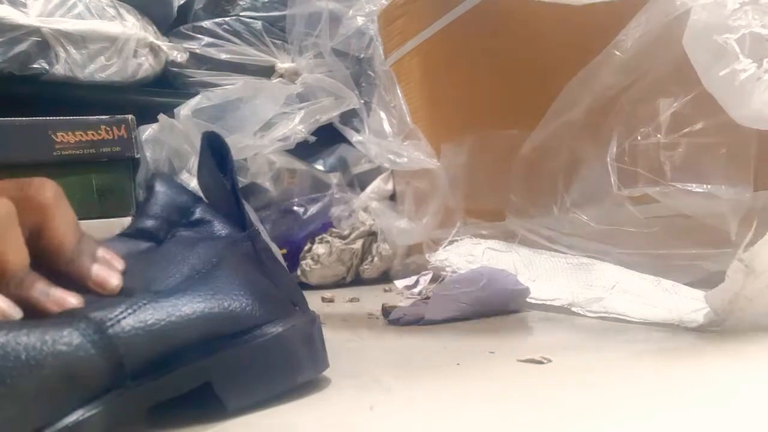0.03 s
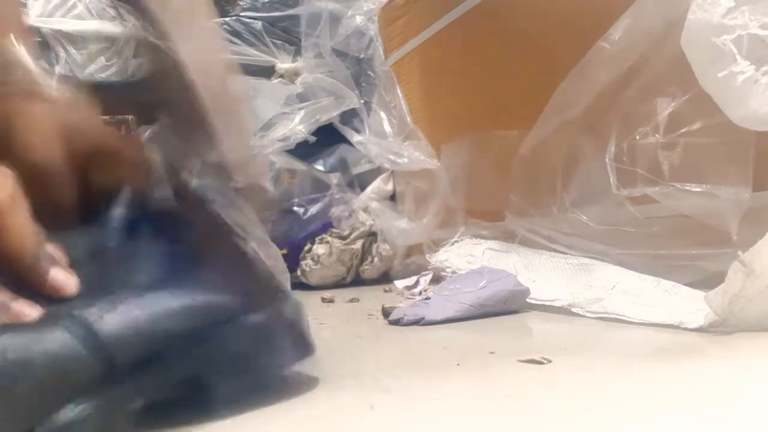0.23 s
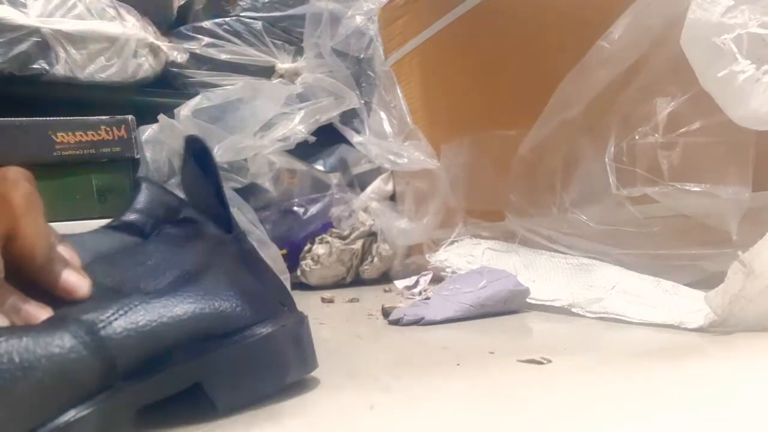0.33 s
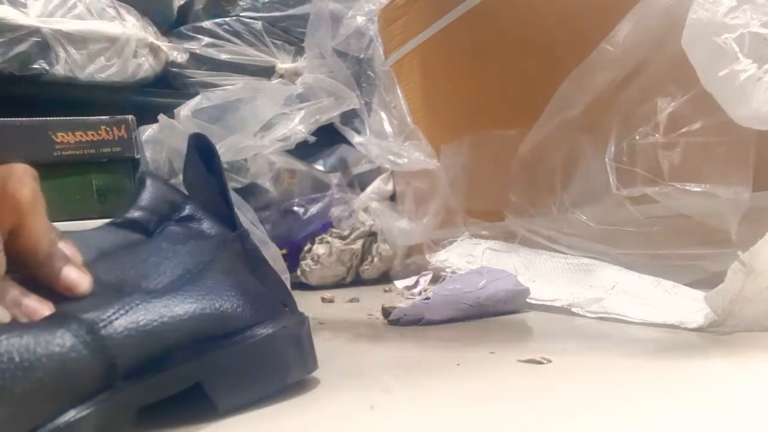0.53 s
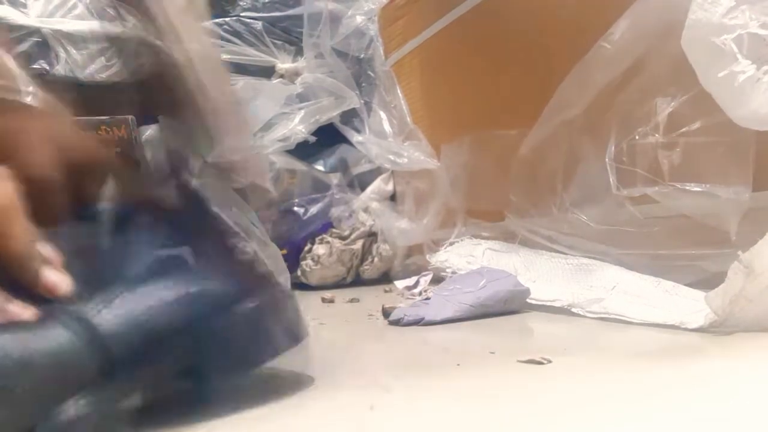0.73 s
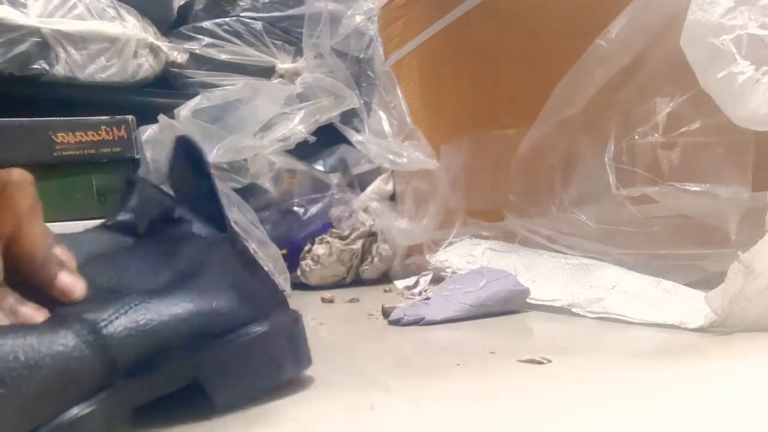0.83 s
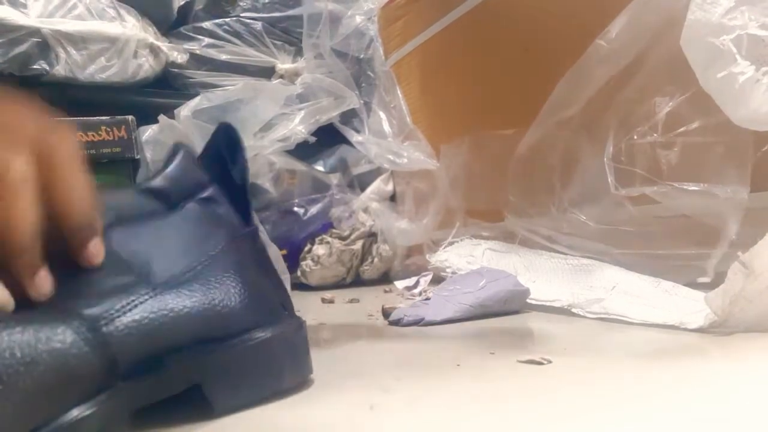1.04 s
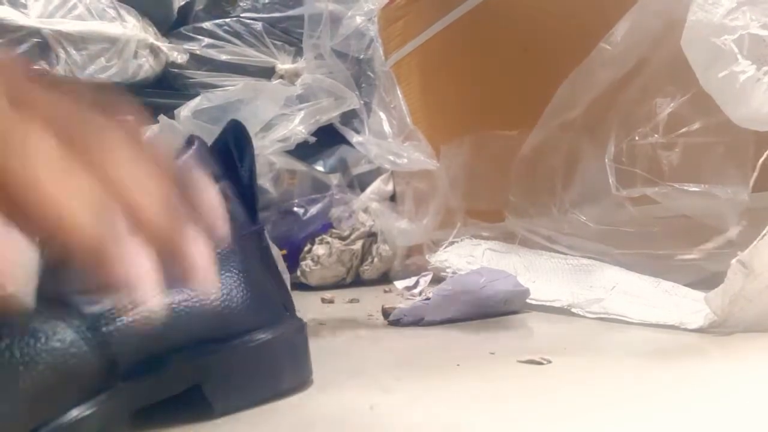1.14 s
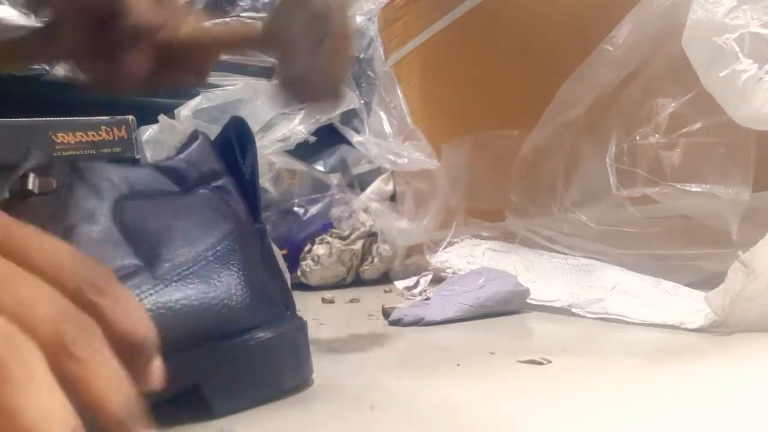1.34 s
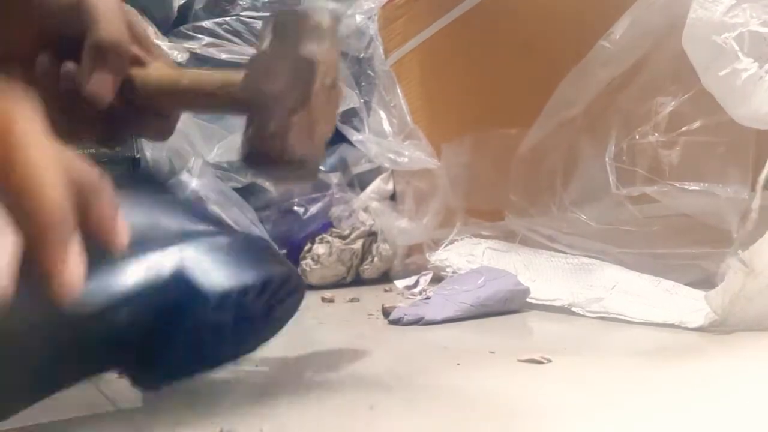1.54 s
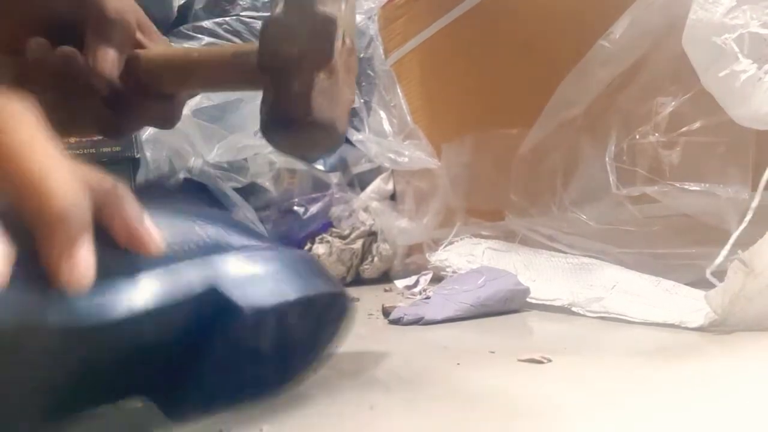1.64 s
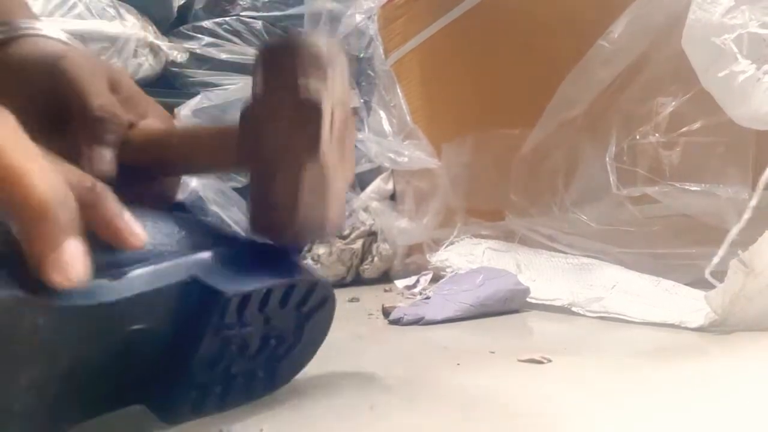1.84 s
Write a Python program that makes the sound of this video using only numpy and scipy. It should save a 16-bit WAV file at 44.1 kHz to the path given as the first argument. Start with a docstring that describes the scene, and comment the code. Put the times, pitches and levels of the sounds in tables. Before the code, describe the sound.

A heavy hammer strikes a leather boot on a workbench twice, each blow a close, cracking thud. Then a hand turns the boot over with soft bumps, ticks and rustling, over the steady tone of a small room.

```python
"""Two close, cracking thuds: a heavy hammer hits a leather boot on a workbench in a small room.
Each blow touches the leather, slams the heel onto the bench and cracks as the sole bottoms out,
leaving a low bench ring and a short room tail. Then a hand turns the boot over with soft bumps,
ticks, rustle and a faint squeak. Steady room tone lies under it all."""
import sys
import numpy as np
from scipy import signal
from scipy.fft import rfft, irfft, next_fast_len
from scipy.io import wavfile
from scipy.ndimage import map_coordinates

SR = 44100
rng = np.random.default_rng(int(sys.argv[2]) if len(sys.argv) > 2 else 0)


def dump_mix(stems):
    """Bounce the given channels to the path in sys.argv[1] as a 16-bit WAV at rate SR."""
    frames = np.atleast_2d(stems).T  # one column per channel
    limited = np.clip(frames, -1, 1)  # hard clip at full scale
    pcm = np.round(limited * 32767).astype(np.int16)
    wavfile.write(sys.argv[1], SR, pcm)


N = 83790

# colour of the room tone: freq_hz, level_db
ROOM_TONE_COLOUR = [(15, -62), (25, -35.5), (70, -8.5), (108, -5), (161, -8), (185, -12), (256, -10.5),
                    (285, -12), (394, -4), (427, -10.5), (489, -1.5), (641, -13), (695, -14.5), (887, -10),
                    (1100, -21), (1290, -16.5), (1480, -24.5), (3620, -24), (16000, -46)]
# colour of the room's tail: freq_hz, level_db
TAIL_COLOUR = [(30, -32), (60, -16), (100, -5.5), (270, 1), (500, -2.5), (800, -6), (1200, -10.5),
               (1900, -17.5), (3600, -16.5), (5000, -23.5), (7300, -27), (8300, -40.5), (13000, -32.5),
               (16000, -40)]
# length of that tail: freq_hz, t60_s
TAIL_DECAY = [(100, 0.3), (260, 0.18), (700, 0.35), (1840, 0.2), (4850, 0.24), (12800, 0.19)]
# stereo width of room and handling: freq_hz, side_over_mid_db
DIFFUSE_WIDTH = [(60, -3.5), (120, -3), (240, -10), (480, -9.5), (950, -1), (1890, 1), (3770, 1), (7520, 1),
                 (15000, -0.5)]

# fader ride of the rustle: time_s, level_db
RUSTLE_RIDE = [(1.1, -66), (1.3, -59.5), (1.45, -55), (1.55, -51.5), (1.66, -52), (1.74, -51), (1.82, -52),
               (1.862, -47), (1.9, -47)]
# colour of the rustle: freq_hz, level_db
RUSTLE_COLOUR = [(80, -44), (250, 1), (550, 1), (900, -2.5), (1400, -9), (2400, -18), (3800, -13),
                 (8000, -30.5), (16000, -31)]
# the hand sliding on leather: middle_s, level_db, half_length_s
HAND_SLIDES = [(1.347, -60, 0.017), (1.515, -66, .022), (1.703, -68, 0.022), (1.893, -71, 0.031)]
# leather rubbing on the bench: middle_s, level_db, half_length_s
BENCH_RUBS = [(1.497, -58.5, 0.027), (1.885, -61, .025)]
# colour of the rubs: freq_hz, level_db
RUB_COLOUR = [(400, -23), (1500, -12), (3300, 4.5), (5000, -3.5), (9000, -13), (16000, -25)]
# small ticks of the leather: start_s, level_db, decay_s
LEATHER_TICKS = [(0.7313, -33, 0.0027), (0.743, -47.5, 0.0098), (1.013, -59, 0.0034),
                 (1.2722, -44.5, 0.0013), (1.488, -56, 0.0012), (1.7954, -49.5, 0.00073)]
# bright colour of ticks and slides: freq_hz, level_db
LEATHER_COLOUR = [(500, -22), (3500, -20), (6500, 6.5), (9500, 0.5), (14500, 7.5), (16000, -4)]
# soft bumps of the handled boot: start_s, level_db, pitch_hz, decay_s
BOOT_BUMPS = [(1.248, -45, 586, 0.0033), (1.298, -48, 520, .006), (1.340, -50, 640, .004),
              (1.4195, -35.5, 527, 0.0046), (1.547, -40, 628, .005), (1.6812, -37.5, 190, 0.0027),
              (1.689, -32, 370, 0.0029), (1.774, -46.5, 575, .008), (1.8604, -35, 382, 0.0045)]
# colour of a bump's noise: pitch_ratio, level_db
BUMP_COLOUR = [(.1, -40), (.35, -11), (.7, -2), (1, 0), (1.6, -5), (2.5, -20), (6, -32), (25, -60)]
# colour of the heel tap: freq_hz, level_db
TAP_COLOUR = [(300, -14), (800, -3), (1800, 3), (2800, -8), (4500, -10), (16000, -32)]

# ring of the bench: pitch_hz, level_db, t60_s
BENCH_MODES = [(120.8, -38.5, 0.36), (177.3, -43, 0.43), (278, -36, 0.25), (494, -37.5, 0.31),
               (698, -42.5, .21)]
# thud of the boot on the bench; where the head lands sets each mode's share:
# pitch_hz, swell_s, first_blow_db, second_blow_db, left_over_right_db
BOOT_MODES = [(157, 0.005, -10, -6, 2), (285, 0.0055, -16, 1.5, 3.5), (356, 0.0039, 1.5, -29, 1),
              (419, 0.003, -14, -0.5, 5.5), (502, 0.0037, -0.5, -9.5, 0), (564, 0.004, -3, 1.8, 5),
              (637, 0.0036, 6.5, -9.5, 5), (720, .0054, -1.5, -1.5, 5), (811, 0.0031, 0.3, 0.5, 1.3),
              (887, 0.0037, -33, -6.5, -5), (1090, 0.0025, -21, -4, -1), (1275, 0.0027, -4.5, -9.5, -8),
              (1466, 0.0027, -4, -6, -1.6), (1658, 0.0037, -4.5, -10.5, -7.5),
              (2265, 0.0021, -12, -6.5, -1), (2660, 0.0016, -17, -4.5, -1)]
# colour of the first touch: freq_hz, level_db
TOUCH_COLOUR = [(80, -27), (300, 1), (700, 2), (1100, 8), (4500, -4), (8000, -12.5), (13000, -11),
                (16000, -21)]
# colour of the crack: freq_hz, level_db
CRACK_COLOUR = [(300, -45), (800, -16.5), (1640, 0), (1920, -9.5), (2500, -5.5), (3500, 1.5), (4300, -9),
                (5000, -3.5), (5800, -4), (7400, -16), (8100, -32.5), (12500, -23.5), (16000, -27)]
# stereo width of the blows: freq_hz, side_over_mid_db
IMPACT_WIDTH = [(100, -19.5), (300, -29), (600, -6), (1200, -3.5), (3000, -5), (10000, 3)]
# mix of each blow: start_s, thud_db, crack_db, dulling_db_per_octave, touch_db, room_db,
# thump_db, slap_db, bottom_out_delay_s, bottom_out_over_thud_db
HAMMER_BLOWS = [(0.2266, -11, -11, -0.5, -29, -23.5, -32, -10.5, 0.00335, -21),
                (0.7285, -16, -19, 2.5, -27.5, -30, -25.5, -12.5, 0.002166, -5.5)]

SIDES = np.array([[1], [-1]]) / 2  # half to the left, minus half to the right
BENCH_LAG_S = 0.00852  # the bench top gives just after the hit


def amp(db):
    """Decibels to gain."""
    return 10 ** (np.asarray(db) / 20)


def unit(x):
    """Scale to rms 1."""
    return x / np.sqrt(np.mean(x ** 2) + 1e-20)


def along(points, hz):
    """Read (freq_hz, value) points on a log axis."""
    freqs, values = np.transpose(points)
    return np.interp(np.log(hz + 1), np.log(freqs + 1), values)


def width(points, hz):
    """Stereo angle for a side over mid ratio."""
    return np.arctan(amp(along(points, hz)))


def since(s):
    """Seconds since s, per sample."""
    return np.arange(N) / SR - s


def fade(s, decay_s):
    """Envelope: hard attack at s, then a decay."""
    t = since(s)
    return (t >= 0) * np.exp(-np.abs(t) / decay_s)


def spike(s, rise_s, fall_s):
    """Envelope: climbs to a point at s and dies away."""
    t = since(s)
    return np.exp(-np.abs(t) / np.where(t < 0, rise_s, fall_s))


def swell(s, half_s):
    """Envelope: a smooth rise and fall around s."""
    return np.exp(-(since(s) / half_s) ** 2)


def wobble(rate_hz):
    """A smooth curve through rate_hz random points a second."""
    knots = rng.standard_normal(int(N * rate_hz / SR) + 4)
    return map_coordinates(knots, [np.arange(N) * rate_hz / SR], mode="nearest")


def filtered(x, response):
    """EQ x with a gain curve over frequency."""
    size = next_fast_len(N + SR // 2)
    return irfft(rfft(x, size) * response(np.fft.rfftfreq(size, 1 / SR)), size)[..., :N]


def noise(colour, spread=DIFFUSE_WIDTH):
    """Coloured stereo noise of rms 1, its width set per frequency."""
    def mid_side_gains(hz):
        angle = width(spread, hz)
        return amp(along(colour, hz)) * [np.cos(angle), np.sin(angle)]
    mid, side = filtered(rng.standard_normal((2, N)), mid_side_gains)
    return unit(np.array([mid + side, mid - side]))


def room_tone(level_db=-53.5):
    """The bed: steady, dark room noise."""
    return amp(level_db) * noise(ROOM_TONE_COLOUR)


def rustle(grain_db=2, grain_hz=150):
    """The boot turns in the hand: an uneven rustle that builds."""
    ride_db = np.interp(since(0), *np.transpose(RUSTLE_RIDE))
    return amp(ride_db + grain_db * wobble(grain_hz)) * noise(RUSTLE_COLOUR)


def friction(strokes, colour, grain_db=4, grain_hz=330):
    """Leather slides against hand or bench: short swells of grainy noise."""
    return sum(amp(db) * unit(amp(grain_db * wobble(grain_hz))) * noise(colour) * swell(s, half_s)
               for s, db, half_s in strokes)


def squeak(middle_s=1.65, level_db=-47, pitch_hz=640, waver=.006):
    """The rubber sole sticks and slips for a moment: one faint wavering tone."""
    hz = pitch_hz * (1 + waver * wobble(rate_hz=60.3))
    return amp(level_db) * swell(middle_s, half_s=.035) * np.sin(2 * np.pi * np.cumsum(hz) / SR)


def ticks():
    """The leather ticks: tiny bright bursts."""
    return sum(amp(db) * noise(LEATHER_COLOUR) * fade(s, decay_s) for s, db, decay_s in LEATHER_TICKS)


def heel_tap(start_s=1.6848, level_db=-40.5):
    """The heel is set down with a dry tap."""
    return amp(level_db) * noise(TAP_COLOUR) * fade(start_s, decay_s=0.0023)


def bump(s, pitch_hz, decay_s, puff_db=-5):
    """A soft contact: one short knock in a puff of dull noise."""
    knock = np.sin(2 * np.pi * pitch_hz * since(s)) * fade(s, decay_s)
    puff = noise([(pitch_hz * ratio, db) for ratio, db in BUMP_COLOUR])
    return knock + amp(puff_db) * puff * spike(s, rise_s=0.00076, fall_s=decay_s)


def handling():
    """The quiet foley layer: all the small sounds of the boot."""
    out = rustle() + squeak() + heel_tap()
    for s, db, pitch_hz, decay_s in BOOT_BUMPS:
        out += amp(db) * bump(s, pitch_hz, decay_s)
    return out + ticks() + friction(HAND_SLIDES, LEATHER_COLOUR) + friction(BENCH_RUBS, RUB_COLOUR)


def room_tail(s, predelay_s=0.0064, early_db=4.5):
    """The room answers as decaying noise: dense early echoes off the clutter, then a short tail."""
    start = s + predelay_s
    hz, t, bands = signal.stft(noise(TAIL_COLOUR), SR, nperseg=256)
    decay_db = -60 * np.maximum(t - start, 0) / along(TAIL_DECAY, hz)[:, None]
    tail = signal.istft(bands * amp(decay_db), SR, nperseg=256)[1][:, :N]
    early_lift = amp(early_db) * fade(start, decay_s=0.0071)
    return tail * ((since(start) >= 0) + early_lift)


def bench_ring(s):
    """The low modes of the bench ring on after the thump."""
    t = np.maximum(since(s + BENCH_LAG_S), 0)
    return sum(amp(db - 60 * t / t60) * np.sin(2 * np.pi * hz * t) for hz, db, t60 in BENCH_MODES)


def bench_thump(s, centre_hz=100):
    """The bench top gives under the blow: one low push, without ring."""
    u = (np.pi * centre_hz * since(s + BENCH_LAG_S)) ** 2
    return (2 * u - 1) * np.exp(-u)


def first_touch(s, lead_s=.0061):
    """The head meets the leather: a scuff just ahead of the hit."""
    return noise(TOUCH_COLOUR, IMPACT_WIDTH) * spike(s - lead_s, rise_s=.0013, fall_s=0.0082)


def heel_slap(s, pitch_hz=612):
    """The heel meets the bench: one abrupt, quickly damped cycle."""
    return -np.sin(2 * np.pi * pitch_hz * since(s)) * fade(s, decay_s=0.002)


def boot_thud(s, blow):
    """Heavily damped modes start together, build as the sole is squeezed and die fast."""
    out, t = np.zeros((2, N)), np.maximum(since(s), 0)
    for hz, swell_s, *shares_db, pan_db in BOOT_MODES:
        envelope = (t / swell_s * np.exp(1 - t / swell_s)) ** 2
        stereo_phase = SIDES * 2 * width(IMPACT_WIDTH, hz)
        out -= amp(shares_db[blow] + SIDES * pan_db) * envelope * np.sin(2 * np.pi * hz * t - stereo_phase)
    return out


def sole_crack(s, peak_s=0.0047):
    """The sole bottoms out: a bright burst with a hard start and a sharp peak."""
    envelope = (since(s) >= 0) * spike(s + peak_s, rise_s=0.0021, fall_s=0.002)
    return noise(CRACK_COLOUR, IMPACT_WIDTH) * envelope


def dulled(x, db_per_octave, from_hz=2500, to_hz=7000):
    """A softer contact loses treble; a negative setting brightens."""
    return filtered(x, lambda hz: amp(-db_per_octave * np.log2(np.clip(hz, from_hz, to_hz) / from_hz)))


def hammer():
    """Each blow stacks touch, double thud, slap, thump and crack, answered by bench and room."""
    out = np.zeros((2, N))
    for blow, mix in enumerate(HAMMER_BLOWS):
        s, thud_db, crack_db, dulling, touch_db, room_db, thump_db, slap_db, bottom_s, bottom_db = mix
        out += amp(touch_db) * first_touch(s)
        out += amp(thud_db) * (boot_thud(s, blow) + amp(bottom_db) * boot_thud(s + bottom_s, blow))
        out += amp(slap_db) * heel_slap(s) + amp(thump_db) * bench_thump(s) + bench_ring(s)
        out += dulled(amp(crack_db) * sole_crack(s) + amp(room_db) * room_tail(s), dulling)
    return out


def scene():
    """Hammer up front, handling behind it, room tone underneath."""
    return hammer() + handling() + room_tone()


def record(dry, low_cut_hz=42, ceiling=.92, top_hz=16100):
    """Output chain: thin the deep bass, soft-clip the peaks, cut the very top."""
    thinned = signal.sosfilt(signal.butter(2, low_cut_hz, "highpass", fs=SR, output="sos"), dry)
    rounded = thinned / (1 + np.abs(thinned / ceiling) ** 6) ** (1 / 6)
    return filtered(rounded, lambda hz: hz < top_hz)


dry = scene()
out = record(dry)
dump_mix(out)
```